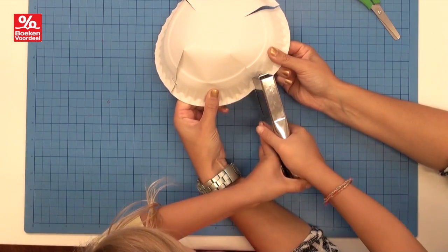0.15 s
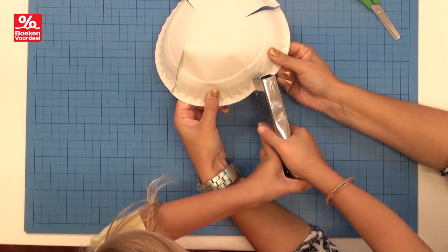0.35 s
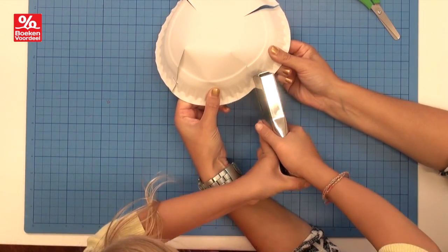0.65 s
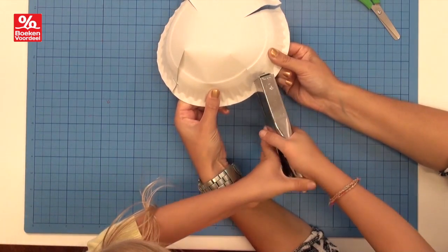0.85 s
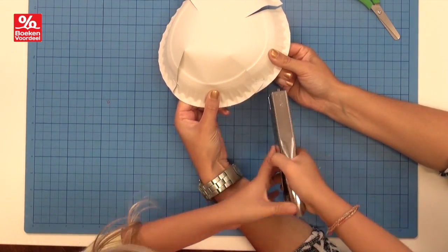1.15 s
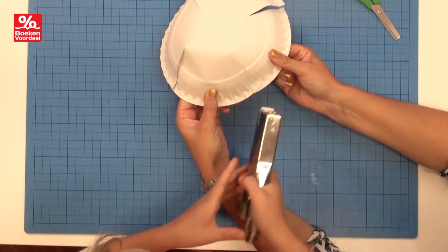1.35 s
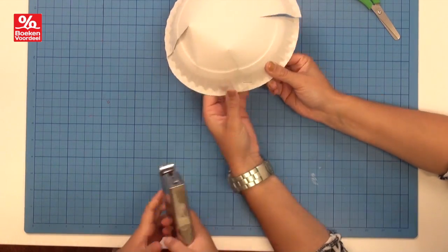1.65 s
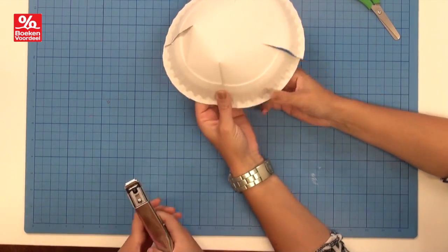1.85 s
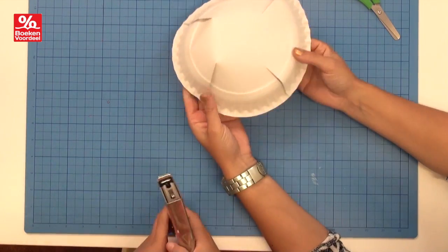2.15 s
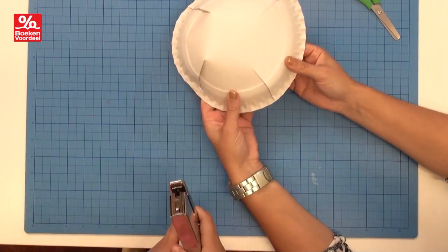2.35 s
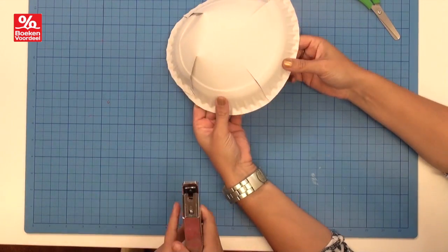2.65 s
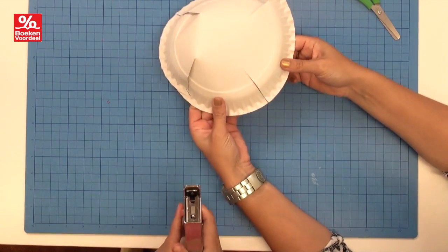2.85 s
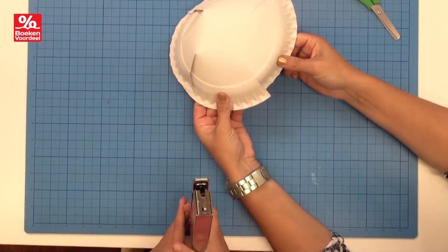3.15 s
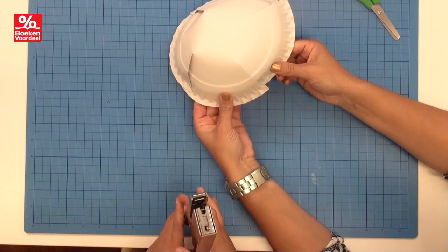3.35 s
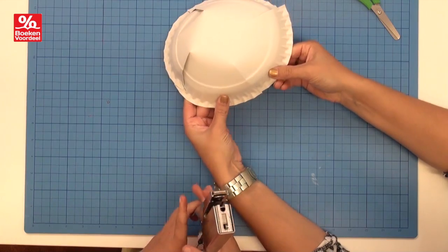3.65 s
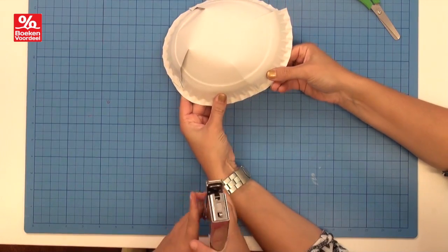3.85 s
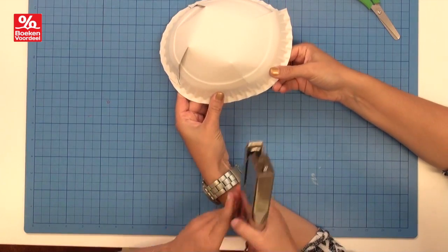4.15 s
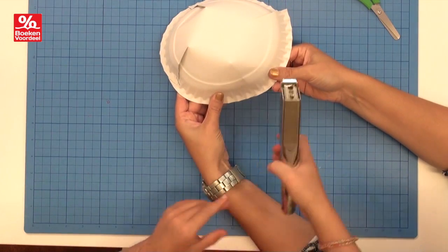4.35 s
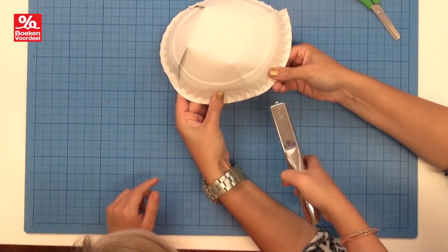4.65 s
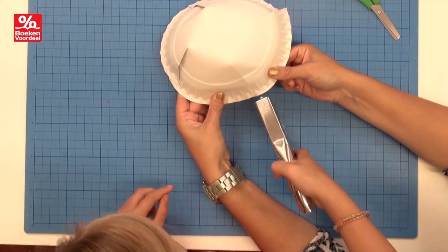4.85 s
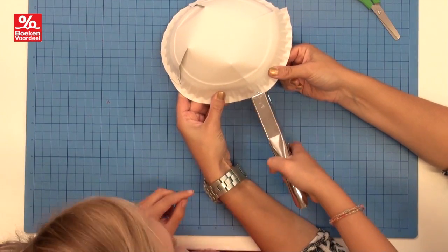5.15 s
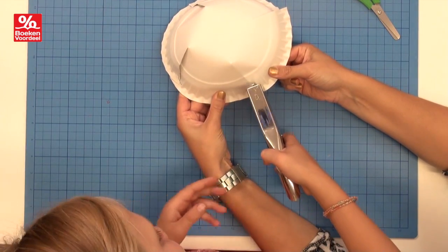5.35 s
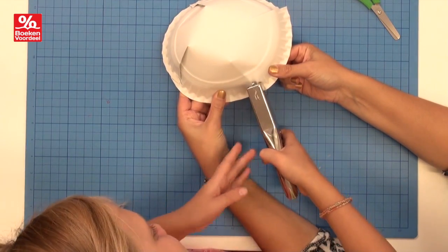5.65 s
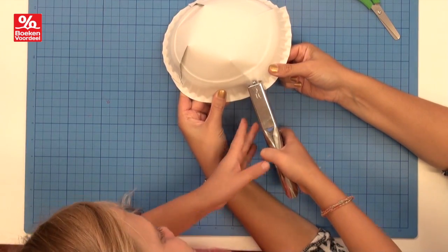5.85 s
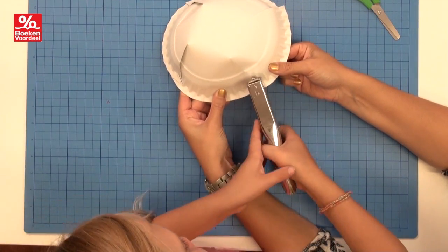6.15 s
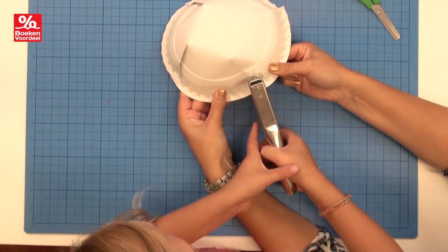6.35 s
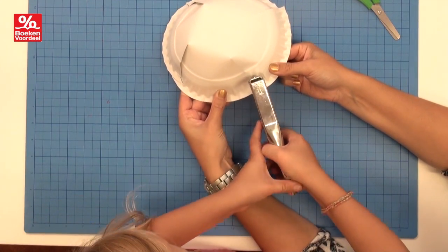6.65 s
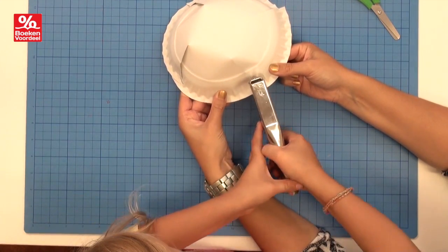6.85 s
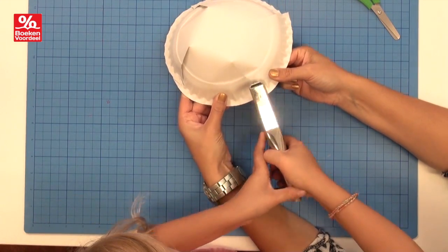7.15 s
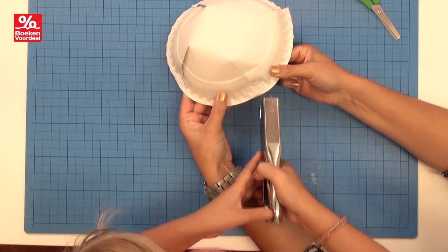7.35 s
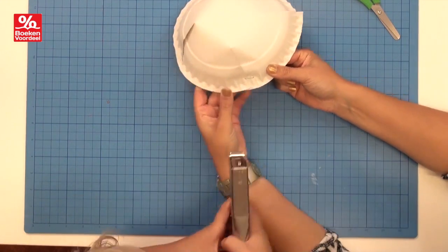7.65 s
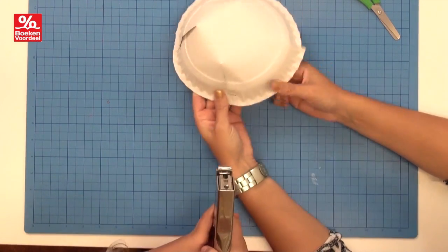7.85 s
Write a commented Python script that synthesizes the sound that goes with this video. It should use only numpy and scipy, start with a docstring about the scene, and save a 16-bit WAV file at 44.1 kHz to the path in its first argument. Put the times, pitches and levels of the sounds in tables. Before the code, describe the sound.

Dry, close, nearly mono sound from above a table: metal jaws snap through paper with a hollow plate drum and thin spring ring. Scratchy finger rustles and dull buckling pops follow for a few seconds, then near quiet, a heavy thud, and several clustered stapling crunches. Short small-room echo, soft low rumble from leaning arms, and quiet background hiss.

```python
"""Clusters of metallic clicks and crunches, with papery rustles, pops and a low rumble around them.
A handheld metal stapler is squeezed shut on the rim of a stiff paper plate above a table in a small room.
Each squeeze is a cluster of contacts: short noise bursts set the stapler ringing and the plate drumming.
Between squeezes fingers turn the plate: grainy noise makes the rustle, short swings make the pops.
Arms on the table shake the microphone stand: random pushes keep low resonances swinging."""
import sys
import numpy as np
from scipy import signal
from scipy.io import wavfile

SR = 44100
rng = np.random.default_rng(int(sys.argv[2]) if len(sys.argv) > 2 else 0)


def bounce(signal):
    """Save signal as a 16-bit WAV file at the path given by the first command-line argument."""
    frames = np.transpose(np.atleast_2d(signal))
    limited = np.clip(frames, -1, 1)
    pcm = np.round(limited * 32767).astype(np.int16)
    wavfile.write(sys.argv[1], SR, pcm)


def rack_gain(trim_db):
    """Turn a fader trim in dB into the linear factor to multiply a signal by."""
    fader = np.asarray(trim_db, float)
    return 10 ** (fader / 20)


N = 352800  # samples: 8 s

# ringing tones of the paper plate [f/Hz, level/dB, time to fall 60 dB/s]
PLATE_MODES = [(489, -11, .05), (525, -4, .07), (572, -4, .1), (590, -1, .12), (628, -5, .08),
               (710, -7, .09), (1090, -10, .03)]
# ringing tones of the stapler's arm [f/Hz, level/dB, time to fall 60 dB/s]
ARM_MODES = [(1600, -8, .06), (1760, -1, .11), (1915, -3, .1), (2260, -6, .05)]


def rms_one(x):
    """Scale a sound to an average strength (rms) of 1."""
    return x / np.sqrt(np.mean(x ** 2) + 1e-20)


def band(x, low_hz, high_hz):
    """Keep only the frequencies between two limits (Butterworth band-pass)."""
    limits = [low_hz, min(high_hz, .45 * SR)]
    return signal.sosfilt(signal.butter(2, limits, "band", fs=SR, output="sos"), x)


def drift(rate_hz):
    """Slow random wandering of rms 1: noise smoothed twice, made at every 40th sample."""
    r = np.exp(-2 * np.pi * rate_hz * 40 / SR)
    white = rng.standard_normal(N // 40 + 2002)
    slow = signal.lfilter([1], [1, -2 * r, r * r], white)[2000:]  # drop the start-up
    return np.interp(np.arange(N) / 40, np.arange(len(slow)), rms_one(slow))


def ring(x, hz, t60):
    """A resonance: a unit click sets off a dying sine that falls 60 dB in t60 seconds."""
    r = rack_gain(-60 / (t60 * SR))
    w = 2 * np.pi * hz / SR
    return signal.lfilter([0, np.sin(w)], [1, -2 * r * np.cos(w), r * r], x + 1e-18)


def bursts(times, db, ms):
    """Each contact is a scuff of noise that swells and dies in a few ms; about unit energy at 0 dB."""
    r = np.exp(-1000 / (ms * SR))
    clicks = np.zeros(N)
    np.add.at(clicks, np.round(np.asarray(times) * SR).astype(int), rack_gain(db))
    swell = signal.lfilter([1], [1, -2 * r, r * r], clicks + 1e-18)
    return 2 * (1 - r) ** 1.5 * swell * rng.standard_normal(N)


def coloured(white, spectrum, patchy_db):
    """Two noises dealt in turn to third-octave bands, each with its level and own flicker; rms 1."""
    hz, db = np.transpose(spectrum)
    edges = 100 * 2 ** np.arange(0, 7.5, 1 / 3)
    out = 0
    for k, (low, high) in enumerate(zip(edges, edges[1:])):
        if high > hz[0] and low < hz[-1]:
            level_db = np.interp(np.log(low * high) / 2, np.log(hz), db)  # at the middle of the band
            flicker_db = patchy_db * drift(20.6)
            out = out + rack_gain(level_db + flicker_db) * band(white[k % 2], low, high)
    return rms_one(out)


def strokes(rows, rise_db_per_s, fall_db_per_s, rest_db):
    """Strokes swell, hold and fade in straight dB slopes over a resting level; one gain per level column."""
    start, hold, *columns = np.array(rows).T[:, :, None]
    t = np.arange(0, N + 32, 32) / SR
    before, after = np.maximum(start - t, 0), np.maximum(t - start - hold, 0)
    shape_db = -rise_db_per_s * before - fall_db_per_s * after
    gains = []
    for db, rest in zip(columns, rest_db):
        together = np.sqrt(np.sum(rack_gain(db + shape_db) ** 2, axis=0))  # strokes add as powers
        gains.append(np.interp(np.arange(N) / SR, t, rack_gain(rest) + together))
    return gains


def stapler():
    """Metal contacts crunch and ring handle, plate, arm and jaw, each mode with a strength of its own."""
    # contacts [t/s, plate drum level/dB, arm ring level/dB, jaw ring level/dB, top sizzle level/dB]
    contacts = [(0.152, -48, -33, -31, -29), (0.156, -42, -30, -19.5, -17), (0.16, -32, -25.5, -22, -22.5),
                (0.831, -51, -41, -23.5, -27), (0.891, -32.5, -37, -19, -15),
                (0.898, -27.5, -32, -0.5, -27), (0.907, -28.5, -32, -42, -31),
                (0.914, -54, -22, -35.5, -35), (0.986, -46, -39.5, -19, -25), (1.106, -66, -49, -28.5, -43),
                (1.148, -72, -51, -40, -54), (1.225, -58, -52, -43.5, -55), (1.258, -65, -67, -54, -57),
                (1.325, -66, -67, -46, -55), (1.357, -62, -46, -46, -55), (1.483, -62, -41, -36.5, -52),
                (5.392, -42.5, -39, -34, -50), (5.6, -50.5, -64, -30.5, -44), (5.606, -47, -63, -29.5, -42),
                (6.197, -34, -32, -41, -34), (6.249, -44, -32, -29, -48), (6.265, -38.5, -35, -30, -29),
                (6.321, -30, -33, -51, -35), (6.413, -22.5, -15, -10, -16), (6.418, -19.5, -20, -32, -30),
                (6.623, -49, -46.5, -26.5, -25.5), (6.848, -29.5, -29.5, -32, -36),
                (6.893, -26.5, -23, -28, -10.5), (6.898, -16.5, -22, -11.5, -34),
                (6.907, -33, -56, -17, -38), (7.146, -46, -38, -36.5, -49), (7.176, -40, -51.5, -28.5, -43),
                (7.187, -37.5, -44, -34, -32), (7.25, -36, -37, -19.5, -27), (7.265, -30, -29, -9.5, -19),
                (7.27, -19.5, -35, -4.5, -26), (7.294, -23, -26, -17, -38), (7.309, -25, -36, -30, -42),
                (7.344, -34, -51, -27, -44), (7.357, -41, -49, -24.5, -28), (7.41, -41, -54, -37, -50),
                (7.424, -38.5, -45.5, -34, -49), (7.561, -35, -34, -22, -33)]
    # ringing tones of jaw, highest treble and handle [f/Hz, level/dB, time to fall 60 dB/s]
    jaw_modes = [(2870, -10, .012), (3450, -9, .012), (3990, -9, .02), (4460, -9, .01), (5350, -1, .008),
                 (6200, -5, .012), (7400, -1, .009), (8300, 0, .007), (9200, -6, .005)]
    sizzle_modes = [(10200, -2, .004), (11550, -3, .008), (12800, -2, .004), (14200, -3, .004)]
    handle_modes = [(980, 0, .15), (1200, -6, .05)]
    # jolts that make the handle ring [t/s, level/dB]
    jolts = [(0.157, -17.5), (0.164, -18), (0.176, -20), (0.833, -31), (0.9, -18.5), (6.197, -30),
             (6.415, -17), (6.899, -24), (7.271, -24), (7.294, -23), (7.56, -17.5)]

    s, *levels = np.transpose(contacts)
    plate_db, arm_db, jaw_db, top_db = levels
    out = rack_gain(28.0) * band(bursts(s, (arm_db + jaw_db) / 2, 2.05), 710, 4140)  # unringing crunch of the wire
    out += rack_gain(27.5) * band(bursts(s, plate_db - 4, 5.8), 400, 1720)
    out += rack_gain(21.0) * band(bursts(s, jaw_db, 1.96), 4960, 9120)
    out += rack_gain(19.5) * band(bursts(s, top_db, 1.55), 9980, 13700)

    # (modes, contact ms, coupling dB)
    parts = [(PLATE_MODES, .8, 2.5), (ARM_MODES, .8, -3), (jaw_modes, .9, -4), (sizzle_modes, .8, -9)]
    for (modes, ms, coupling_db), db in zip(parts, levels):
        for hz, mode_db, t60 in modes:
            strength_db = rng.normal(0, 2.5, len(s))
            out += ring(bursts(s, db + coupling_db + mode_db + strength_db, ms), hz, t60)

    jolt_s, jolt_db = np.transpose(jolts)
    for hz, mode_db, t60 in handle_modes:
        out += ring(bursts(jolt_s, jolt_db - 8.5 + mode_db, 1.0), hz, t60)
    return out


def scrapes():
    """The jaws drag over the ribbed rim: stuttering noise, part of it drumming plate and arm."""
    # drags [start t/s, hold/s, scrape level/dB, plate drum level/dB]
    drags = [(0.145, 0.0098, -43, -52), (0.837, 0.042, -35.5, -41), (4.824, 0.0062, -35.5, -39),
             (6.179, 0.055, -33, -37.5), (6.245, 0.059, -36.5, -50), (6.296, 0.0035, -24, -34),
             (6.305, 0.028, -35, -43), (6.855, 0.076, -35.5, -42), (7.15, 0.017, -38.5, -57),
             (7.176, 0.047, -36.5, -65), (7.566, 0.11, -33, -49)]
    bright, drum = strokes(drags, rise_db_per_s=2496, fall_db_per_s=502, rest_db=(-150, -150))
    stutter = rack_gain(3.5 * drift(70)) * rng.standard_normal(N)
    body = 0
    for hz, db, t60 in PLATE_MODES + ARM_MODES:
        body = body + rack_gain(db) * ring(stutter, hz, t60 * .35)  # rings shorter than after a contact
    return rack_gain(-6.0) * (bright * rms_one(band(stutter, 910, 7600)) + drum * rms_one(body))


def twangs():
    """The feed spring rings on thinly after the blow, outlasting the clatter."""
    # blows to the spring [t/s, then level/dB for each spring tone]
    blows = [(0.906, -40, -52, -56, -51), (0.989, -33, -44, -56, -56), (1.003, -37, -30, -56, -61),
             (1.107, -54, -53, -65, -62), (6.416, -56, -56, -52, -50), (6.906, -38, -56, -43, -32),
             (7.3, -43, -50, -54, -36), (7.429, -50, -60, -62, -57)]
    # ringing tones of the spring [f/Hz, time to fall 60 dB/s]
    spring_modes = [(1597, .5), (3311, .2), (4463, .5), (7935, .42)]
    s, *levels = np.transpose(blows)
    return sum(ring(bursts(s, db, 0.65), hz, t60) for (hz, t60), db in zip(spring_modes, levels))


def rubs():
    """Rubbing heard through one narrow resonance: noise rides on a gliding pitch, swells and fades."""
    # rubs [start t/s, length/s, from f/Hz, to f/Hz, width/Hz, level/dB]
    glides = [(1.543, 0.14, 858, 1702, 400, -46.5), (1.666, 0.042, 3100, 3190, 200, -48),
              (1.699, .03, 1876, 1770, 300, -44), (1.75, .045, 2500, 2350, 250, -46),
              (1.755, 0.035, 3150, 3020, 250, -45), (1.791, 0.056, 2750, 3135, 700, -40.5),
              (3.276, 0.043, 7420, 7230, 1200, -40), (3.28, 0.029, 3200, 3080, 400, -42),
              (3.332, .04, 1920, 1490, 500, -37), (5.07, 0.17, 1740, 1775, 300, -62),
              (5.131, 0.11, 4350, 4350, 700, -57.5), (5.233, 0.11, 4400, 4700, 1100, -50.5),
              (7.331, .022, 12000, 12100, 220, -39)]
    out = np.zeros(N)
    stutter = rack_gain(3.0 * drift(50))
    for start, length, from_hz, to_hz, width_hz, db in glides:
        part = np.linspace(0, 1, round(length * SR))
        r = np.exp(-np.pi * width_hz / SR)
        slow = rms_one(signal.lfilter([1], [1, -r], rng.standard_normal((2, 9000))))
        a, b = slow[:, 1000:1000 + len(part)]
        phase = 2 * np.pi * np.cumsum(from_hz + (to_hz - from_hz) * part) / SR
        swell = np.sqrt(np.sin(np.pi * part) + 1e-9)
        at = round(start * SR)
        out[at:at + len(part)] += rack_gain(db) * swell * (a * np.cos(phase) + b * np.sin(phase))
    return stutter * band(out, 700, 15100)


def pops():
    """A buckling fold of the plate pushes and pulls at its own pitch, with a dull knock and papery snap."""
    # buckling folds [t/s, level/dB, f/Hz, bright snap level/dB]
    folds = [(0.067, -27.5, 730, -60), (1.397, -41.5, 494, -36), (1.508, -38, 1510, -31),
             (1.718, -31.5, 720, -34.5), (1.83, -40, 796, -33.5), (2.057, -22.5, 1070, -60),
             (2.123, -28.5, 820, -29), (2.181, -42, 1100, -33), (2.389, -29.5, 820, -41),
             (2.583, -23, 880, -26.5), (2.619, -35, 804, -34), (2.848, -36, 710, -26.5),
             (3.221, -19.5, 750, -26), (3.208, -46, 900, -39), (3.238, -29, 800, -36),
             (3.32, -30, 714, -26.5), (3.568, -46, 800, -38), (3.433, -30.5, 840, -45),
             (3.645, -28.5, 550, -30), (3.811, -27, 840, -48), (4.082, -41, 619, -33),
             (4.322, -31, 720, -41.5), (4.381, -35.5, 580, -45), (4.686, -38.5, 1590, -49),
             (5.458, -38, 600, -38), (5.489, -41, 620, -45), (5.72, -14.5, 1210, -33),
             (7.81, -33, 760, -33.5), (7.892, -34, 794, -30.5), (7.964, -13.5, 1130, -51)]
    out = np.zeros(N + 400)
    t = np.arange(400) / SR - .002  # each swing is centred 2 ms after its listed time
    for s, db, hz, snap_db in folds:
        at = round(s * SR)
        out[at:at + 400] -= rack_gain(db + 5) * np.sin(2 * np.pi * hz * t) * np.exp(-(t * hz / .6) ** 2)
    s, db, hz, snap_db = np.transpose(folds)
    knock = rack_gain(17) * band(bursts(s + .002, db, 2.5), 250, 1800)
    snap = rack_gain(24.5) * band(bursts(s + 0.00094, snap_db, 1.0), 1800, 7260)
    return out[:N] + knock + snap


def rustle():
    """Skin catches and slips on paper fibres: clumped grains over friction noise, as hiss and hollow body."""
    # finger strokes [start t/s, hold/s, hiss level/dB, hollow body level/dB]
    slides = [(0.07, 0.035, -50, -42), (0.17, 0.041, -51, -42.5), (0.78, 0.1, -54, -51),
              (0.96, 0.063, -40, -39.5), (1.15, 0.5, -67, -61), (1.6, 0.071, -49.5, -50),
              (1.69, 0.15, -38.5, -43.5), (1.97, 0.15, -52, -57.5), (2.13, 0.063, -44, -42),
              (2.3, 0.033, -40, -45), (2.4, 0.091, -40.5, -45), (2.585, 0.022, -37, -38.5),
              (2.65, 0.24, -47.5, -48.5), (3.015, 0.013, -52.5, -53), (3.23, 0.013, -42, -44),
              (3.283, 0.059, -38.5, -36), (3.41, 0.05, -39, -38), (3.49, 0.0097, -48, -43),
              (3.56, 0.019, -49, -49), (3.65, 0.054, -43, -39), (3.81, 0.16, -42, -41),
              (4.055, 0.041, -40.5, -40), (5.25, 0.064, -56.5, -64), (5.89, 0.1, -48.5, -44.5),
              (6.46, 0.095, -48, -49), (6.63, 0.13, -56, -50.5), (6.95, 0.048, -45, -49),
              (7.3, 0.31, -53, -47), (7.81, 0.091, -42.5, -43.5), (7.97, .05, -36.5, -39)]
    # colour of the hiss and of the hollow body [f/Hz, level per Hz/dB]
    hiss_colour = [(710, 11.5), (1200, 9.5), (1900, -6.5), (3250, -4), (5500, -2.5), (8500, -3),
                   (11000, -5.5), (13500, -29), (16000, -13)]
    hollow_colour = [(76, 14), (130, -2), (183, -7.5), (595, -2), (660, 0), (810, 2.5), (1250, -5),
                     (2000, -10), (2600, -44), (4400, -120)]
    # fingers that only hold the plate keep the resting levels
    slide, bowl = strokes(slides, rise_db_per_s=402, fall_db_per_s=145, rest_db=(-60, -64))

    clumps = rack_gain(.8 * drift(12) + 1.5 * drift(60))
    sizes = rack_gain(3.9 * np.minimum(rng.exponential(1, (2, N)), 4))
    happens = rng.random((2, N)) < 500 * clumps / SR  # around 500 grains a second
    grains = rms_one(sizes * happens * rng.choice([-1, 1], (2, N)))
    friction = clumps * (rng.standard_normal((2, N)) + grains)

    hiss = coloured(friction, hiss_colour, 2.4)
    hollow = coloured(friction, hollow_colour, 2.0)
    crisp = rack_gain(-4.5) * rms_one(band(hiss, 6300, 19845))
    return slide * (rms_one(band(hiss, 2000, 9200)) + crisp) + bowl * hollow


def bumps():
    """Bumps on the table: low swings under a dull thud; close rows carry on the ringing of one bump."""
    # swings of the table [t/s, level/dB, f/Hz, thud level/dB]
    swings = [(0.071, -20, 220, -46), (0.08, -18, 229, -44), (0.089, -19, 223, -44), (0.098, -20, 220, -50),
              (1.699, -20, 114, -49), (2.584, -18.5, 157, -31), (3.219, -12.5, 218, -28.5),
              (4.317, -25, 92, -32), (5.7238, -4.5, 112, -20.5), (5.745, -11, 95, -42),
              (5.773, -24, 150, -34), (5.79, -10.5, 68, -30.5)]
    out = np.zeros(N + 8000)
    t = np.arange(8000) / SR
    soft_start = 1 - np.exp(-t / .0015)
    for s, db, hz, thud_db in swings:
        at = round(s * SR)
        swing = np.sin(2 * np.pi * hz * t) * np.exp(-t * hz / .85)
        out[at:at + 8000] += rack_gain(db - 1.5) * swing * soft_start
    s, db, hz, thud_db = np.transpose(swings)
    return out[:N] + rack_gain(40.5) * band(bursts(s, thud_db, 12.0), 135, 380)


def rumble():
    """Arms lean on the table: random pushes keep the low resonances of stand and table swinging."""
    # leaning arms [start t/s, hold/s, slow sway level/dB, table hum level/dB]
    leans = [(0.0, 0.0099, -36, -69), (0.176, 0.055, -29, -43.5), (0.575, 0.038, -56, -53),
             (0.904, 0.025, -41, -41), (1.751, 0.11, -37, -33.5), (2.376, 0.22, -41, -40.5),
             (3.695, 0.34, -47.5, -41.5), (4.24, 0.075, -43, -42), (5.823, 0.031, -41, -33.5),
             (6.08, 0.24, -44, -43), (6.448, 0.074, -28.5, -32), (6.625, 0.092, -39, -52),
             (6.928, 0.048, -28, -33.5), (7.34, 0.08, -33, -36.5), (7.982, .05, -47, -38)]
    # resonances of the slow sway and of the table hum [f/Hz, width/Hz, level/dB]
    sway_modes = [(41.4, 9.8, -3)]
    hum_modes = [(73.6, 17, 6), (103, 16, -9.5), (160, 17, -16)]
    gains = strokes(leans, rise_db_per_s=221, fall_db_per_s=90, rest_db=(-47, -50))
    out = 0
    for resonances, gain in zip((sway_modes, hum_modes), gains):
        push = rng.standard_normal(N + SR)  # one extra second to get the swing going
        swing = 0
        for k, (hz, width_hz, db) in enumerate(resonances):
            t60 = np.log(1000) / (np.pi * width_hz)
            swing = swing + (-1) ** k * rack_gain(db) * rms_one(ring(push, hz, t60))
        out = out + gain * rms_one(band(swing, 17.0, 360)[SR:])
    return out


def room(x):
    """Dense echoes of a small room: a tail of noise in which each octave dies at its own pace."""
    # echo decay [f/Hz, time to fall 60 dB/s]
    decay_times = [(300, 0.29), (1000, 0.33), (3000, 0.32), (8000, 0.27), (14000, 0.25)]
    hz, t60 = np.transpose(decay_times)
    t = np.arange(SR // 2) / SR
    tail = 0
    for low in 100 * 2. ** np.arange(8):
        octave_t60 = np.interp(np.log(low * np.sqrt(2)), np.log(hz), t60)
        tail = tail + rack_gain(-60 * t / octave_t60) * band(rng.standard_normal(len(t)), low, 2 * low)
    tail = tail * (t > 0.00538)  # the first echo comes after 5.38 ms
    return signal.fftconvolve(x, tail / np.sqrt(np.sum(tail ** 2)))[:N]


def air():
    """The quiet background: steady coloured noise with a slight flicker."""
    # colour of the background [f/Hz, level per Hz/dB]
    air_colour = [(59, -29), (100, 5.5), (189, -6.5), (244, -6.5), (373, -12), (634, -13.5), (1030, -18.5),
                  (3470, -24.5), (5530, -27), (14700, -26.5), (16000, -35)]
    return rack_gain(-51) * coloured(rng.standard_normal((2, N)), air_colour, 0.19)


def microphone_hiss():
    """The microphone's own hiss: faint coloured noise."""
    # colour of the hiss [f/Hz, level per Hz/dB]
    self_colour = [(59, -31), (100, 0), (970, -7), (2000, -9), (15000, -12), (16000, -15)]
    return rack_gain(-64) * coloured(rng.standard_normal((2, N)), self_colour, 0.33)


def scene():
    """All sources sit straight below the microphone and reach both channels nearly alike."""
    hits = stapler() + pops() + scrapes() + twangs() + rubs()
    mid = hits + rack_gain(-7.5) * room(hits) + bumps() + rustle() + rumble() + air()
    side = rack_gain(-38.5) * rumble() + rack_gain(-56) * room(hits)  # the small left-right difference
    return np.array([mid + side, mid - side])


def top_cut(x):
    """Nothing passes above the cut-off."""
    return signal.sosfilt(signal.butter(12, 16000, fs=SR, output="sos"), x)


def record(dry):
    """The microphone adds hiss of opposite sign left and right, peaks overload and the top is cut."""
    hissing = dry + microphone_hiss() * np.array([[1], [-1]])
    clipped = np.clip(hissing, -1, 1)
    low_pass = signal.cheby2(12, 41, 16400, fs=SR, output="sos")  # 41 dB down from 16400 Hz
    finished = signal.sosfilt(low_pass, clipped)
    return top_cut(finished)


dry = scene()
out = record(dry)
bounce(out)
```